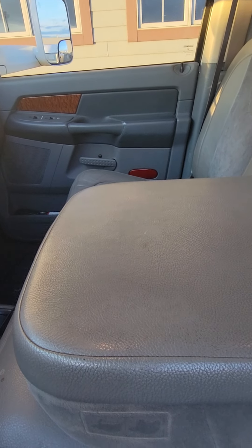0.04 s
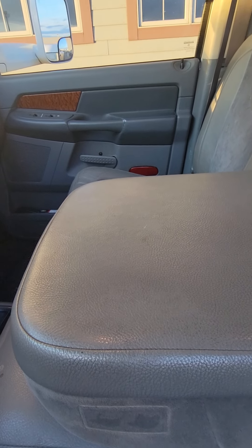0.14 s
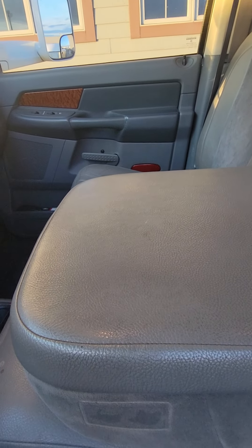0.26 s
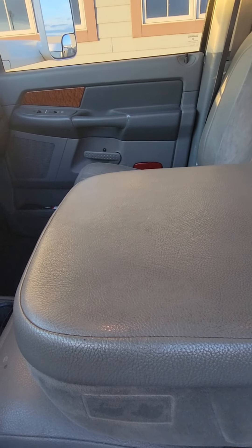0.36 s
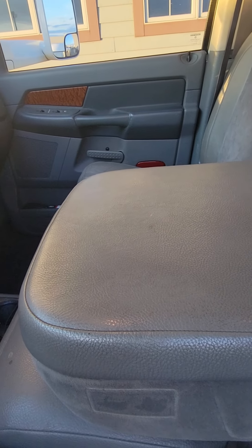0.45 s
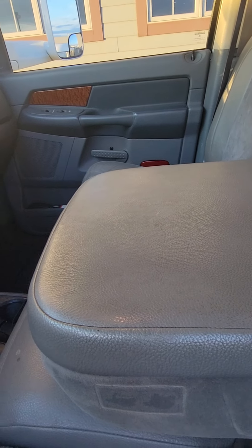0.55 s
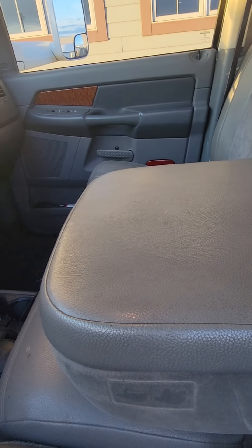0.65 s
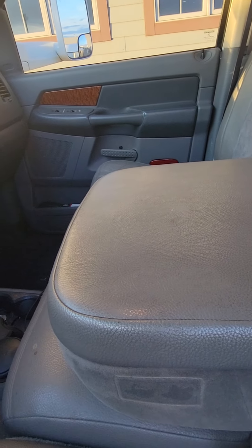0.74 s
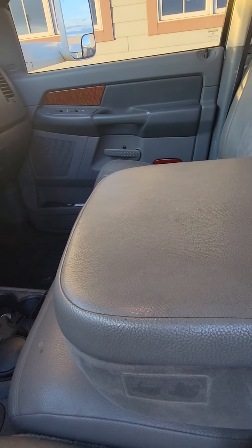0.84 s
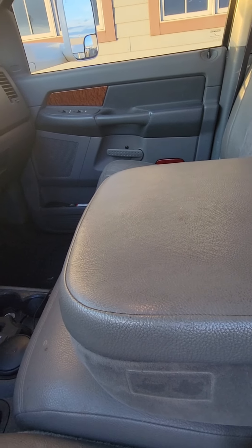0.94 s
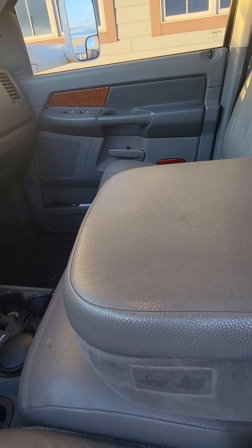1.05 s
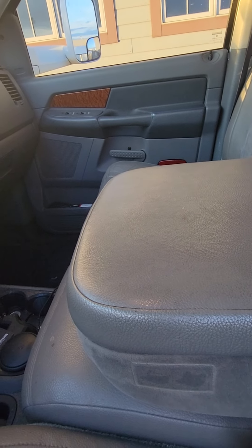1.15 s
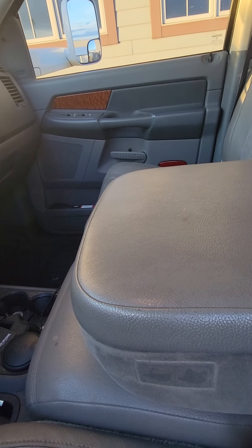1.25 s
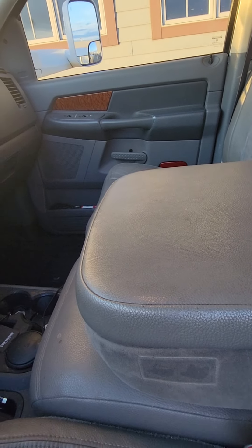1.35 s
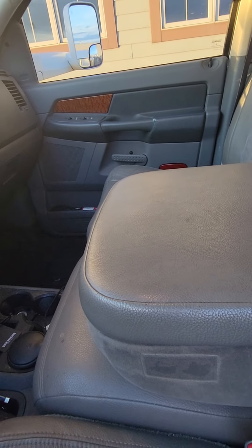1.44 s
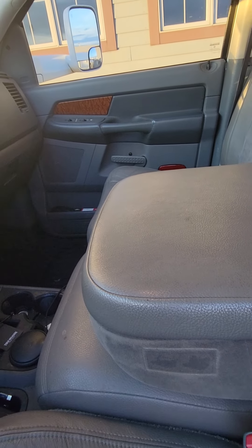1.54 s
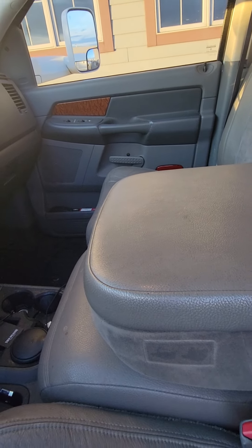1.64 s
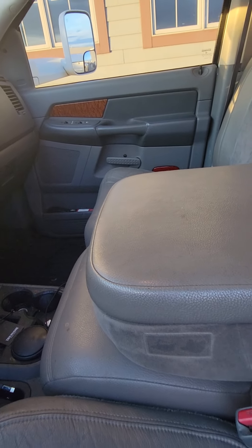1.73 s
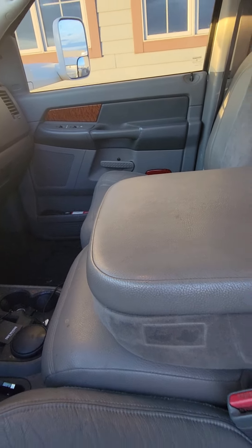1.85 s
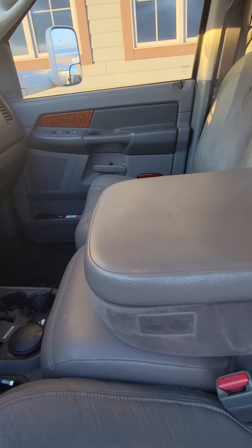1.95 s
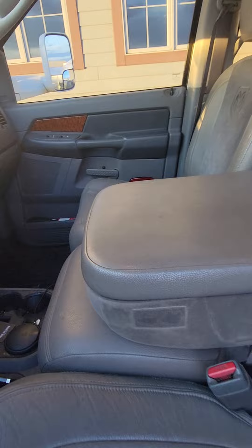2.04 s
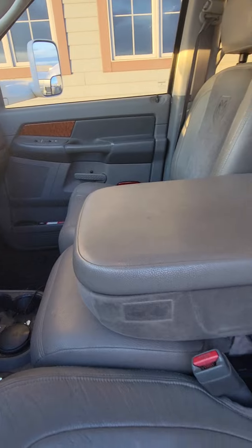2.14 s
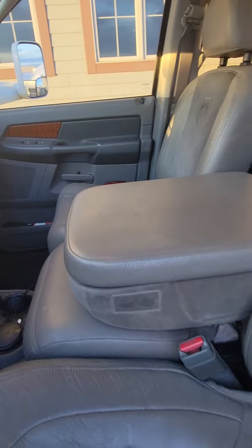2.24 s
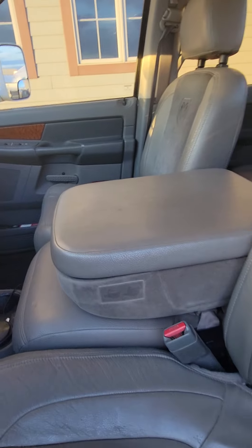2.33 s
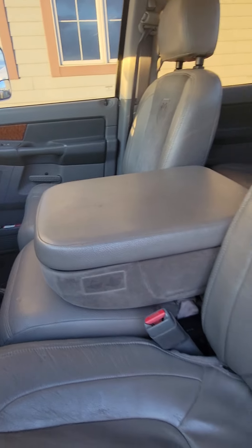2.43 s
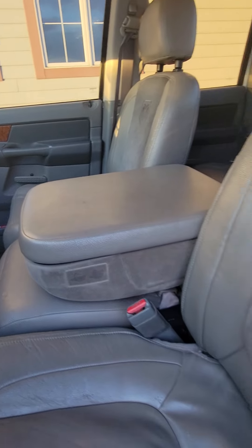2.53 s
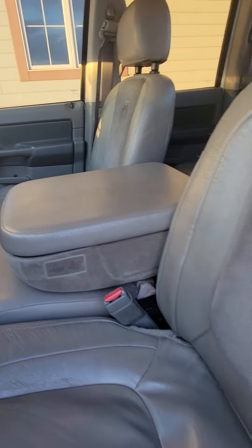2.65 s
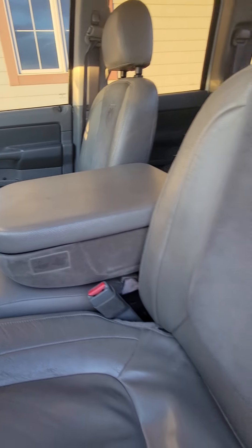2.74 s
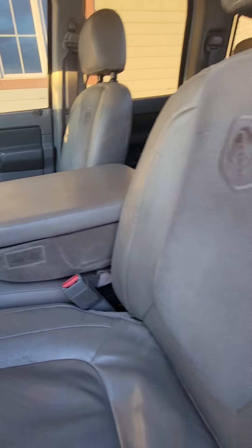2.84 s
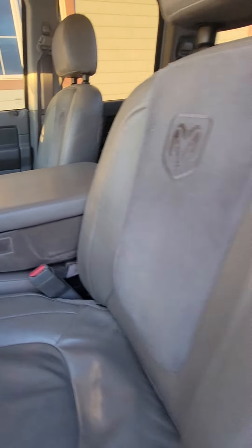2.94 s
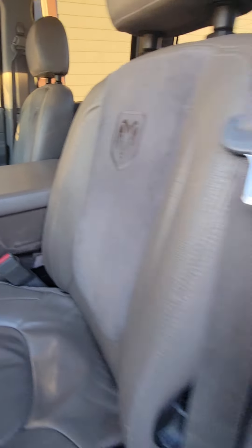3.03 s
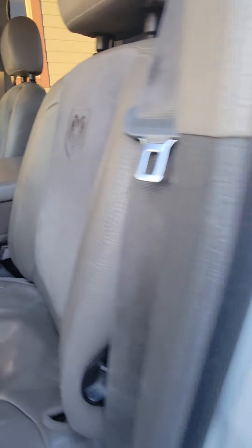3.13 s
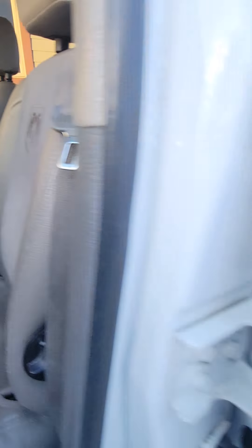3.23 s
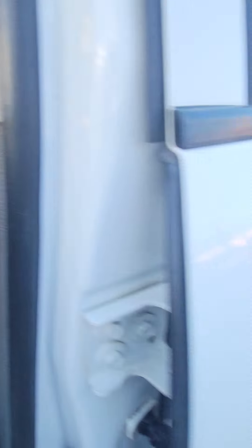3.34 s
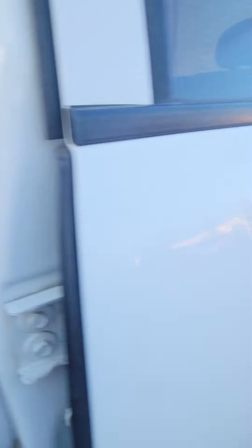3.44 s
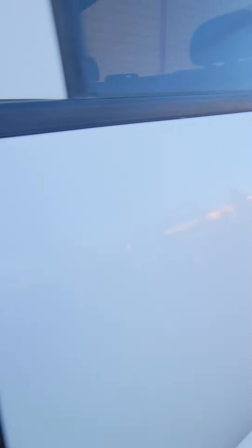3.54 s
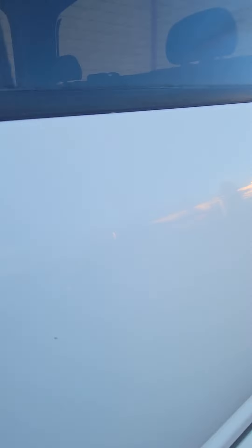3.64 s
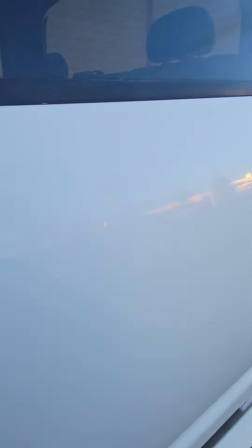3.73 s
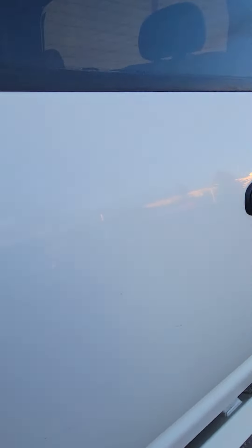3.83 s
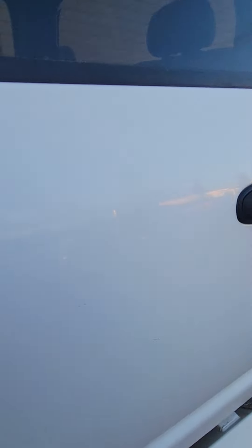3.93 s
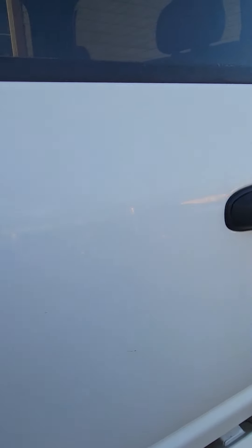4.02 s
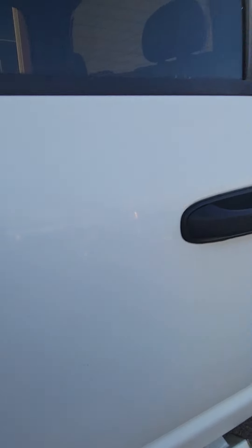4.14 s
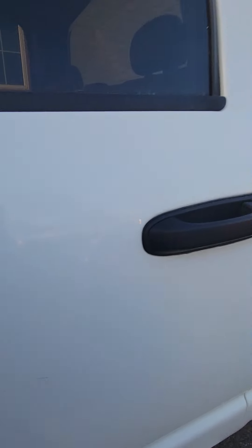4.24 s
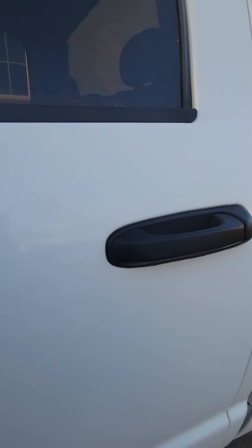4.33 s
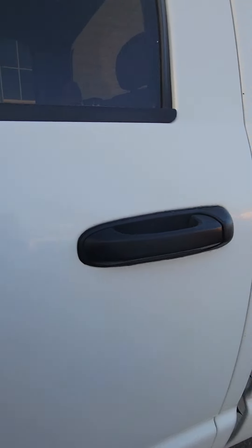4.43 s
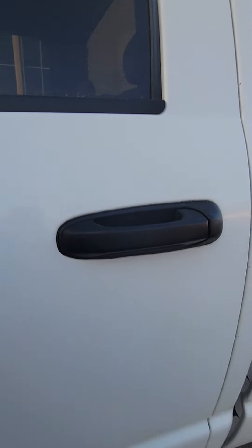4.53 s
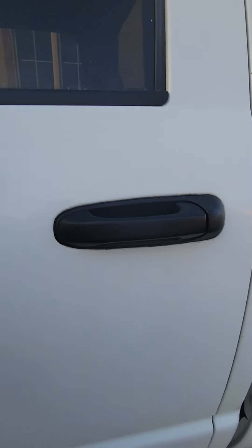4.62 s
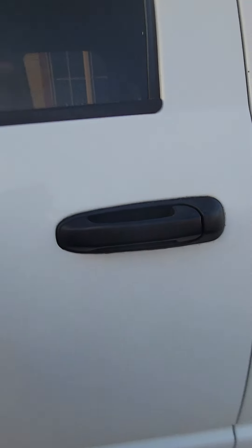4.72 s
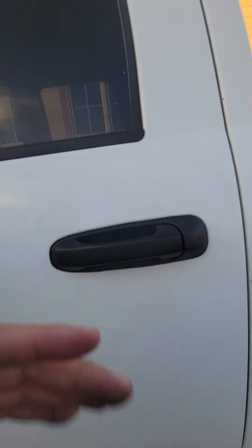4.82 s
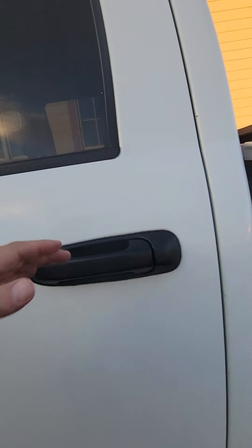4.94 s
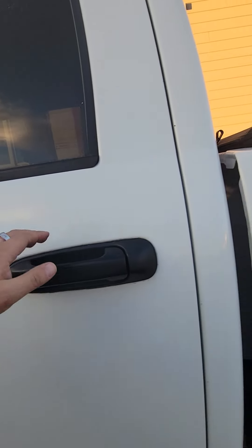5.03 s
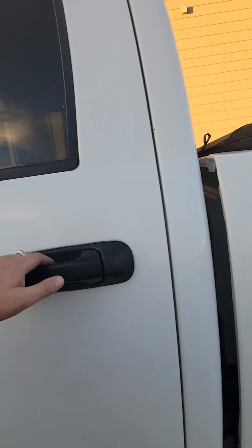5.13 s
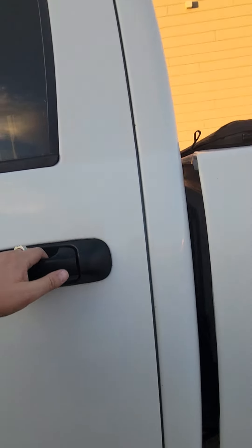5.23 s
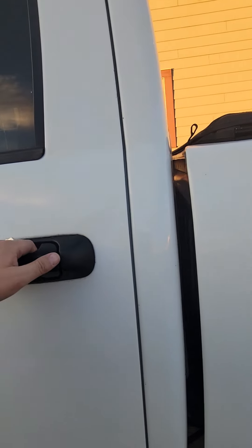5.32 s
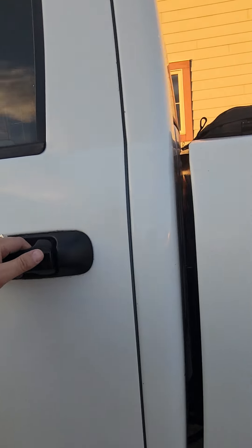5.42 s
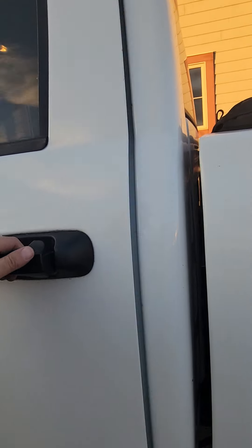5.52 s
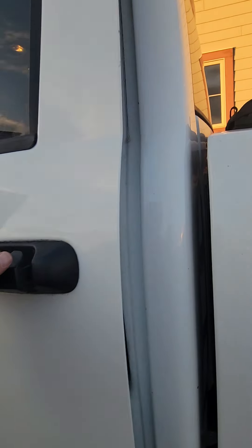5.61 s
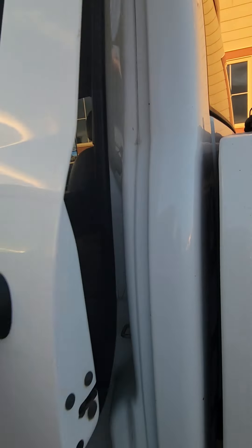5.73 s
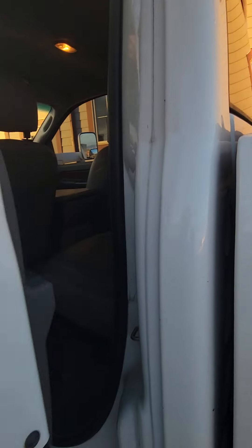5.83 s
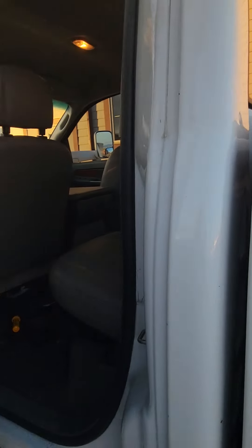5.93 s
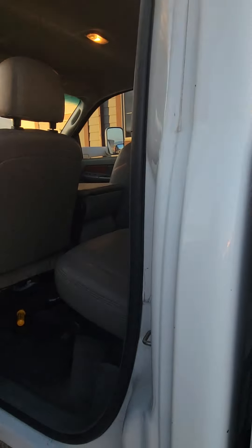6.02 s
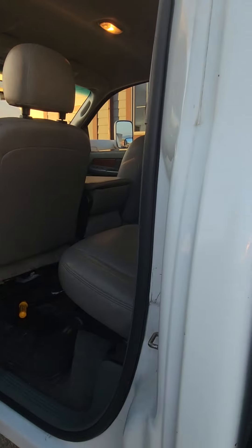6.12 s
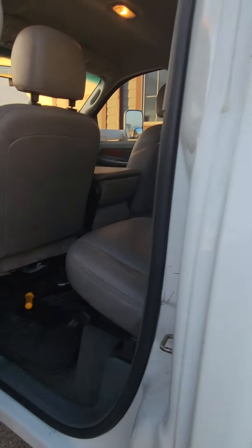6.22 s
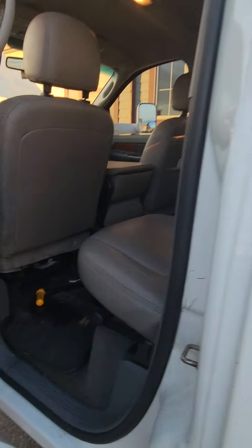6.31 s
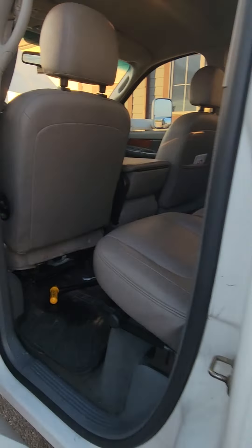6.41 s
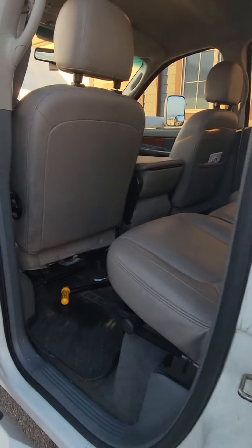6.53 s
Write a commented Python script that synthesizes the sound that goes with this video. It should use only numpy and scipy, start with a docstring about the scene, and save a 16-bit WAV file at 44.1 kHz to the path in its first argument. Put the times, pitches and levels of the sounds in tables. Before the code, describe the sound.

A bunch of keys rattles before a truck door unlatches with a squeak and a loud clunk, then knocks as it swings open.

```python
"""First comes a low hum of distant traffic, which grows as a phone backs out of a truck cab into a yard.
Keys jingle in the hand, two footsteps thud and scuff on gravel, cloth rustles and wind puffs on the phone.
A rear door handle squeaks as its pivot sticks and slips, and the latch clunks, ringing the door panel.
The door swings over its check strap (the arm that holds it open) and knocks at the stop."""
import sys
import numpy as np
from scipy import signal
from scipy.fft import rfft, irfft, next_fast_len
from scipy.io import wavfile
from scipy.ndimage import uniform_filter1d

SR = 44100
rng = np.random.default_rng(int(sys.argv[2]) if len(sys.argv) > 2 else 0)


def transcribe(u):
    """Save the signal u as a 16-bit wav file named by the first command-line argument.

    u: samples, shape (n,) or (channels, n), limited to [-1, 1]; the rate is SR.
    q: integer samples, one column per channel.
    """
    v = np.clip(np.atleast_2d(u).T, -1, 1)
    q = np.round(v * 32767).astype(np.int16)
    wavfile.write(sys.argv[1], SR, q)


N = 289648

# keys knocking together: t/s, level/dB, brightness/(dB per octave)
KEY_CLINKS = [(1.267, -55, -7), (1.311, -62, -5), (1.761, -62, -2), (1.81, -63, -5), (1.902, -58.5, -1.5),
              (2.35, -40.5, 1), (2.371, -41, 2), (2.406, -36, -3.5), (2.427, -32, 2.5), (2.4676, -34, 7),
              (2.484, -30, 2), (2.491, -29.5, 0.5), (2.51, -35, 0), (2.748, -51, 5), (2.957, -42, 13),
              (3.0095, -40, -4.5), (3.0632, -33.5, -6), (3.221, -34, -8), (3.287, -30.5, -7),
              (3.369, -36, -0.5), (3.397, -52, -3), (3.407, -17, 3), (3.4252, -22, -3), (3.472, -36, -2),
              (3.512, -40.5, 4), (3.588, -30.5, 4.5), (3.629, -17, 2), (3.6402, -20, -3.5),
              (3.688, -43, 10), (3.6955, -22, 18), (3.717, -27, 7), (3.7331, -28, -1), (3.748, -24.5, 5.5),
              (3.7658, -22.5, 7), (3.781, -29, -3), (3.795, -38, 12), (3.814, -35.5, -6),
              (3.827, -33.5, -3), (3.834, -36, -2), (4.056, -47.5, -2), (4.161, -38.5, -3),
              (4.1863, -44.5, -1), (4.3566, -42.5, -12), (4.5844, -29, -13.5), (4.7577, -32.5, -16.5)]
# the phone turns toward the opening door: t/s, left minus right/dB
PHONE_TURN = [(5.7, -4), (6.4, -2)]


def door_and_footsteps():
    """Door knocks and clunks, and dull footstep thuds: each is a push and a chatter, duller if longer."""
    # door knocks, and two footsteps at 4.509 s and 5.266 s:
    # t/s, level/dB, contact/ms, chatter/ms, favoured pitch/Hz
    impacts = [(3.143, -28.5, 0.3, 1.3, 625), (4.509, -31, 0.42, 61, 344), (5.266, -29, 1.26, 31, 245),
               (5.503, -29, 1.1, 15, 500), (5.6197, -5, 1.08, 0.74, 298), (5.6222, -1, 2.55, 0.34, 207),
               (5.627, -3, 2.78, 1.2, 137), (5.664, -21, 0.91, 18, 690), (6.127, -27, 1.7, 6.8, 350),
               (6.137, -20.5, 0.88, 12, 547), (6.153, -16.5, 1.44, 10.4, 360), (6.163, -26, 1.5, 3, 370),
               (6.194, -27, 2.1, 8, 400), (6.381, -16, 0.64, 14.6, 510), (6.403, -18.5, 5.1, 20, 90),
               (6.427, -4.5, 0.27, 6.7, 1700)]
    # the door's natural tones, which also colour the footsteps: f/Hz, level/dB, time to fade 60 dB/s
    modes = [(80, 7.5, 0.13), (118, 5.5, 0.07), (167.7, 5, 0.091), (227, 4, 0.06), (302.7, 2.5, 0.098),
             (363, -0.5, 0.095), (408, -7, 0.07), (530, -5, 0.033), (646, -6.5, 0.03), (770, -4.5, 0.045),
             (1037, -1.5, 0.021), (1366, -4, 0.026), (1735, -3, 0.024), (2066, -7.5, 0.048),
             (2780, -14, 0.05)]
    out, t = np.zeros((2, N)), np.arange(4000) / SR
    for s, db, contact_ms, chatter_ms, favoured_hz in impacts:
        push = np.sin(np.linspace(0, np.pi, int(contact_ms * SR / 1000) + 3)) ** 2
        chatter = rng.standard_normal(len(t)) + 0.91 * band(rng.standard_normal((2, len(t))), 720, 0.88)
        force = undb(-0.5) * chatter * np.exp(-1000 * t / chatter_ms) / np.sqrt(len(push))
        force[:, 0] = 1  # the first contact
        mix, detune = rng.standard_normal((2, len(modes)))
        # tones far above the favoured pitch barely ring
        above = np.log2(np.array(modes)[:, 0] / favoured_hz)
        mode_db = 1.6 * mix - 6.35 * above - 5.4 * np.abs(above)
        tones = np.diff(ring(modes, mode_db, 1 + 0.016 * detune, 0.26))
        hit = signal.fftconvolve(force, np.convolve(tones, push)[None])
        add(out, undb(db) * hit / np.abs(hit).max(), s, np.interp(s, *np.transpose(PHONE_TURN)), .05)
    return out


def handle_squeak():
    """The pivot sticks and slips: an almost pure tone with weak overtones, swelling at each slip."""
    # slips of the pivot: t/s, length/s, level/dB, f/Hz
    slips = [(5.479, 0.01, -33, 2170), (5.482, 0.027, -12.5, 2250), (5.5009, 0.0155, -4.5, 2360),
             (5.511, 0.023, -21.5, 2320), (5.527, 0.045, -37.5, 2300), (5.578, 0.021, -16.5, 2335),
             (5.598, 0.0089, -24, 2390)]
    # the tone and its overtones: multiple of the pitch, level/dB
    harmonics = [(1, -1.5), (2, -37), (3, -32), (4, -24.5), (5, -46.5), (6, -44.5)]
    out, swell = np.zeros((2, N)), np.zeros(N)
    for s, length, db, _ in slips:
        u = np.linspace(0, 1, int(length * SR))
        swell[int(s * SR):][:len(u)] += undb(db) * np.sin(np.pi * u ** 1.2) ** 1.06
    start, length, _, slip_hz = np.transpose(slips)
    hz = np.interp(np.arange(N) / SR, start + 0.39 * length, slip_hz)
    phase = 2 * np.pi * np.cumsum(hz * (1 + 0.006 * wander(440))) / SR
    # light slips lose the high overtones; the weakest overtones rasp
    bite = np.clip(swell / undb(-25.5), 0, 1)
    tone = sum(undb(db + (db < -31) * 4.8 * wander(990)) * bite ** (k > 3) * np.sin(k * phase)
               for k, db in harmonics)
    add(out, swell * undb(1.4 * wander(220)) * tone, 0, pan_db=-6, lag_ms=.1)
    return out


def keys():
    """Each clink is a sharp crack plus a brief metal chime; around the clinks the bunch rattles."""
    # the keys' natural tones: f/Hz, level/dB
    key_tones = [(2780, -0.5), (4400, -20.5), (5150, 6), (5510, 6.5), (9100, -17), (10300, 8.5),
                 (12200, -2.5), (13900, 9), (15100, -0.5), (15500, 8.5)]
    fade_s = .017  # the fingers damp all tones alike
    modes = np.column_stack([key_tones, np.full(len(key_tones), fade_s)])
    octaves = np.log2(modes[:, 0] / 7000)
    out, t = np.zeros((2, N)), np.arange(int(.1 * SR)) / SR
    # random light clinks before the bunch swings
    ticks = rng.random((26, 3)) * [.72, 7, -8] + [1.6, -67, -5]
    for s, db, bright_db in [*KEY_CLINKS, *ticks]:
        mix, detune = rng.standard_normal((2, len(modes)))
        fade = undb(-60 * t / 0.0058) + undb(-6.5 - 60 * t / 0.025)
        contact = grit(len(t), 3.5) * np.clip(t / 0.0011, 0, 1) * fade
        # the struck key knocks its neighbour a few ms later
        contact = contact + undb(-12) * np.roll(contact[::-1], rng.integers(130, 700), axis=1)
        chime = ring(modes, 4 * mix + bright_db * octaves, 1 + .02 * detune, .1)
        chime = signal.fftconvolve(chime, contact[0])[:len(t)]
        chime_db = -3.5 + 0.45 * (db + 30.5)  # light touches barely ring
        crack = band(contact[0] + 13.6 * contact, 7000 * undb(bright_db), 0.67)
        clink = undb(chime_db) * chime / np.abs(chime).max() + crack / np.abs(crack).max()
        add(out, undb(db) * clink, s - .001, pan_db=-9, lag_ms=.42)
    bass_cut = signal.butter(3, 1800, "high", fs=SR, output="sos")  # small keys give off no bass
    return signal.sosfilt(bass_cut, out + key_rattle(modes, -4 * octaves))


def key_rattle(modes, mode_db):
    """The keys slide on their ring: a rattle builds up to each clink and dies away after it."""
    rise_s, fade_s = 0.085, 0.17  # each over 60 dB
    grains = grit(N, 3.2)
    metal = signal.fftconvolve(grains, ring(modes, mode_db, np.ones(len(modes)), .1)[None])[:, :N]
    slide = unit(metal) + undb(7) * unit(band(grains, 5500, 1.3))
    s, clink_db, _ = np.transpose(KEY_CLINKS)[:, :, None]
    since = np.arange(0, N, 32) / SR - s
    db = -58.5 + 0.89 * (clink_db + 25) - 60 * np.maximum(since / fade_s, -since / rise_s)
    level = np.repeat(np.sqrt(np.sum(undb(db) ** 2, axis=0)), 32)[:N]
    return level * undb(3.5 * wander(60)) * slide * undb([[-4], [4]])


def scrapes():
    """Rubbing makes bursts of tiny clicks that catch and slip; the surface favours patches of pitch."""
    # rubs of shoe, hand and door rubber: t/s, length/s, level/dB, f/Hz
    rubs = [(3.1437, 0.0045, -37, 1550), (3.154, 0.0072, -48, 1950), (4.504, 0.06, -39.5, 2460),
            (4.574, 0.037, -44.5, 5500), (5.259, 0.053, -39, 2170), (5.552, 0.12, -48.5, 2350),
            (5.614, 0.022, -47.5, 5670), (5.661, 0.031, -52, 1870), (6.032, 0.13, -57, 2500),
            (6.118, 0.063, -50, 2470), (6.306, 0.025, -50.5, 2070), (6.378, 0.057, -52.5, 3300),
            (6.424, 0.046, -37.5, 1650), (6.425, 0.017, -36.5, 14200), (6.443, 0.065, -46.5, 14400),
            (6.452, 0.072, -42, 3580), (6.547, 0.017, -49.5, 1380)]
    out, catch = np.zeros((2, N)), undb(3 * wander(250))
    for s, length, db, hz in rubs:
        u = np.linspace(0, 1.6, int(1.6 * length * SR))
        shape = np.clip(u / 0.37, 0, 1) * np.exp(-(u / 0.74) ** 3)
        grains = grit(len(u), 2.6)
        grains[0] += 0.016 * grains[1]
        patches = sum(unit(band(grains, min(hz * 1.6 ** k, 15000), .07)) for k in rng.standard_normal(16))
        fizz = unit(band(grains, 24000, 0.4))
        rub = unit(band(grains, hz, 1.0)) + undb(-13) * patches + undb(-12) * fizz
        add(out, undb(db) * shape * rub, s, np.interp(s, *np.transpose(PHONE_TURN)), .2)
    return out * catch


def wind():
    """Air puffs on the microphones as the phone and the door move."""
    # low puffs: t/s, length/s, level/dB, f/Hz
    gusts = [(3.552, 0.33, -42, 56), (3.794, 0.33, -33.5, 62.3), (5.63, 0.16, -35, 53.7),
             (6.194, .13, -29, 65), (6.449, 0.095, -31.5, 74.4)]
    return swells(gusts, octaves=0.73)


def faint_rings():
    """Very narrow bands of noise sound like faint, brief ringing."""
    # ringing patches: t/s, length/s, level/dB, f/Hz
    rings = [(2.37, .07, -57.5, 4570), (2.38, 0.045, -56, 5340), (3.14, 0.68, -60, 1804),
             (3.15, .3, -64, 2880), (4.88, 0.17, -64, 3130), (5.17, 0.037, -58, 2260),
             (6.04, 0.03, -54, 2140), (6.085, 0.051, -48.5, 2300), (6.09, 0.04, -52.5, 4180),
             (6.08, .16, -51.5, 1790), (6.13, 0.21, -64, 2910), (6.475, .025, -41.5, 3690)]
    return swells(rings, octaves=.035)


def yard():
    """Flickering noise bands make low rumble, distant traffic in the middle and cloth rustle on top."""
    # traffic grows as the phone leaves the cab and rounds the truck: t/s, level/dB
    traffic = [(0, -59.5), (2, -57.5), (2.9, -56), (3.3, -54), (4.5, -49.5), (5.2, -51), (5.9, -46.5),
               (6.57, -43.5)]
    # the background's balance from bass to treble: f/Hz, relative level/dB
    colour = [(13, -35), (24, 3.5), (45, 4.5), (90, 13), (145, -19.5), (314, -19), (463, -29), (762, -23.5),
              (1520, -31.5), (3130, -37.5), (3500, -40.5), (6260, -48.5), (10600, -55), (14800, -62),
              (16500, -81.5)]
    # high hiss and rustle: t/s, level/dB
    rustle = [(0, -73.5), (.45, -76), (.8, -83), (1.7, -80), (2.15, -72), (2.7, -79), (3.2, -61),
              (3.9, -70), (4.45, -65), (4.65, -53), (4.86, -69.5), (4.96, -58), (5.08, -72.5), (5.5, -65),
              (6, -68.5), (6.2, -64.5), (6.3, -67), (6.57, -55.5)]
    traffic_db = curve(traffic)
    rumble_db = -49 + 0.81 * (traffic_db + 55)
    levels = [rumble_db, traffic_db, curve(rustle)]
    layers, bass_hz, treble_hz = np.zeros((3, 2, N)), 130, 2100
    hz_points, db_points = np.transpose(colour)
    crinkle_db = 1.2 * wander(32)  # cloth crinkles in all treble bands at once
    for hz in 25 * 2 ** np.arange(0, 9.6, .5):
        noise = band(rng.standard_normal((2, N)), hz, 0.26)
        alike = np.clip(1.05 - hz / 900, .25, 1)  # both sides hear nearly the same bass
        noise[0] = alike * np.roll(noise[1], 12) + np.sqrt(1 - alike ** 2) * noise[0]
        db = np.interp(np.log(hz), np.log(hz_points), db_points) + 1.61 * wander(9)
        db += (hz > treble_hz) * (crinkle_db + 1.5 * wander(20))
        # the more the cab muffles the traffic, the duller it is
        db += (bass_hz < hz < treble_hz) * 0.11 * np.log2(hz / 700) * (traffic_db + 53)
        layers[int(hz > bass_hz) + int(hz > treble_hz)] += undb(db) * noise
    lean_right = undb([[-1.7], [1.7]])
    mic_hiss = undb(-93) * unit(band(rng.standard_normal((2, N)), 14000, .3))
    return mic_hiss + lean_right * sum(unit(layer) * undb(db) for layer, db in zip(layers, levels))


def swells(rows, octaves):
    """Flickering noise bands that swell and fade, different on the left and right."""
    out = np.zeros((2, N))
    for s, length, db, hz in rows:
        u = np.linspace(0, 1, int(length * SR))
        noise = unit(band(rng.standard_normal((2, len(u))), hz, octaves))
        add(out, undb(db) * np.sin(np.pi * u) ** 0.5 * noise, s, 0, 0)
    return out * undb(3 * wander(60))


def undb(db):
    """Turns decibels into a gain."""
    return 10 ** (np.asarray(db) / 20)


def unit(x):
    """Scales a sound to an average power of 1."""
    return x / np.sqrt(np.mean(x ** 2))


def band(x, hz, octaves):
    """Keeps a bell-shaped range of pitches around hz."""
    size = next_fast_len(x.shape[-1])
    f = np.arange(1, size // 2 + 2) * SR / size
    bell = np.exp(-.5 * (np.log2(f / hz) / octaves) ** 2)
    return irfft(rfft(x, size) * bell, size)[..., :x.shape[-1]]


def wander(rate):
    """Glides to a new random value, typically within 1 of zero, rate times a second."""
    hold = int(SR / rate)
    steps = np.repeat(rng.standard_normal(N // hold + 1), hold)
    return 1.3 * uniform_filter1d(uniform_filter1d(steps, hold), hold)[:N]


def curve(rows):
    """Joins (time, value) points with straight lines."""
    return np.interp(np.arange(N) / SR, *np.transpose(rows))


def ring(modes, db, detune, length):
    """The fading tones of a tapped object; db and detune shift each tone's level and pitch."""
    hz, own_db, fade_s = np.transpose(modes)[:, :, None]
    t = np.arange(int(length * SR)) / SR
    level = undb(own_db + db[:, None] - 60 * t / fade_s)
    return np.sum(level * np.sin(2 * np.pi * hz * detune[:, None] * t), axis=0)


def add(out, x, s, pan_db, lag_ms):
    """Mixes a sound in at time s; the left side is pan_db louder and lag_ms later."""
    for ch, (db, at) in enumerate([(pan_db / 2, s + lag_ms / 1000), (-pan_db / 2, s)]):
        i = int(at * SR)
        part = np.atleast_2d(x)[-ch][:N - i]
        out[ch, i:i + len(part)] += undb(db) * part


def grit(count, spread_db):
    """Dense tiny clicks in stereo, a few much louder than the rest."""
    return rng.standard_normal((2, count)) * undb(spread_db * rng.exponential(size=count))


def scene():
    """Mixes the sources; the truck and a house wall briefly echo the keys, scrapes, door and steps."""
    near = keys() + scrapes() + door_and_footsteps()
    t = np.arange(int(.3 * SR)) / SR
    tail = band(rng.standard_normal((2, len(t))), 1200, 1.21) * undb(-60 * t / 0.11) * (t > .004)
    tail /= np.sqrt(np.sum(tail ** 2, axis=1, keepdims=True))
    echo = undb(-14.5) * signal.fftconvolve(near, tail, axes=1)[:, :N]
    return near + echo + handle_squeak() + yard() + wind() + faint_rings()


def record(dry):
    """The phone rounds off the loudest peaks and cuts the highest treble."""
    ceiling, top_hz = 1.08, 16300
    rounded = ceiling * np.tanh(undb(1.27) * dry / ceiling)
    return signal.sosfilt(signal.ellip(8, .2, 70, top_hz, fs=SR, output="sos"), rounded)


dry = scene()
out = record(dry)
transcribe(out)
```